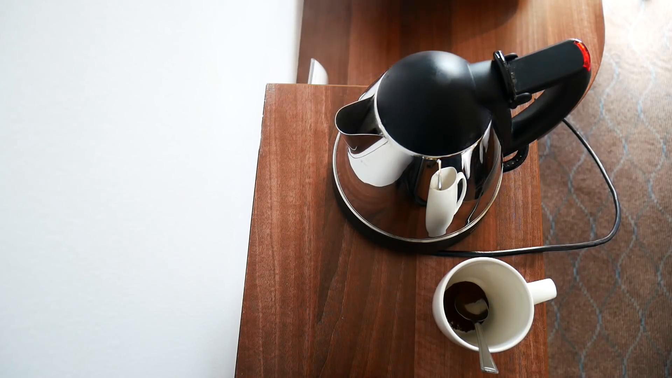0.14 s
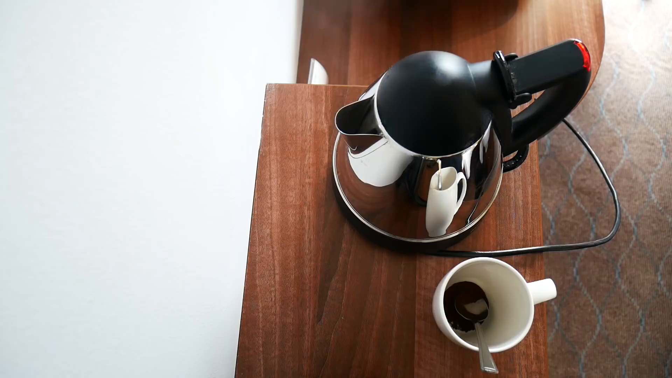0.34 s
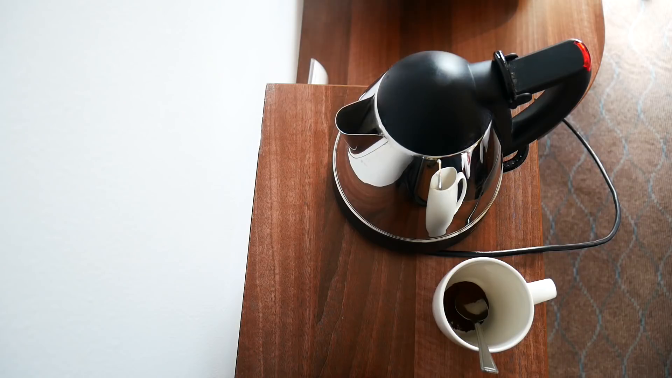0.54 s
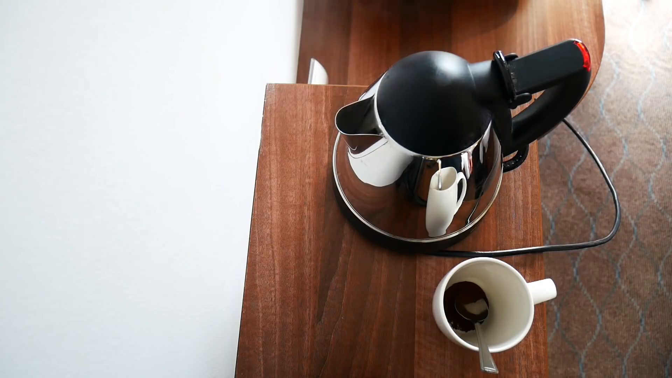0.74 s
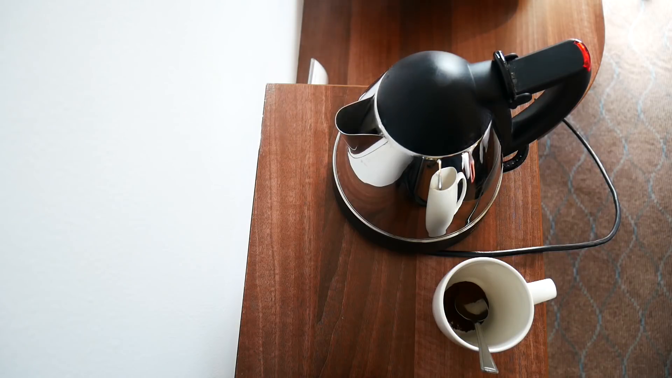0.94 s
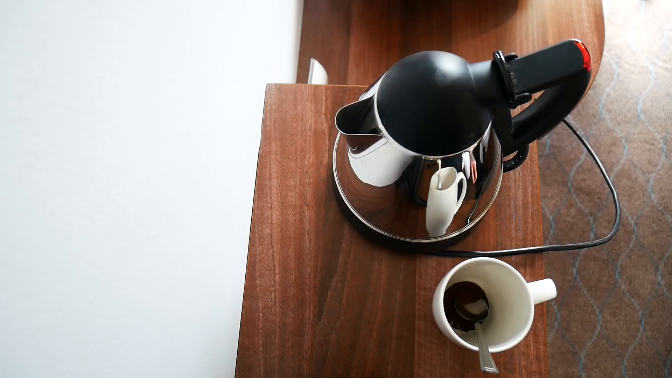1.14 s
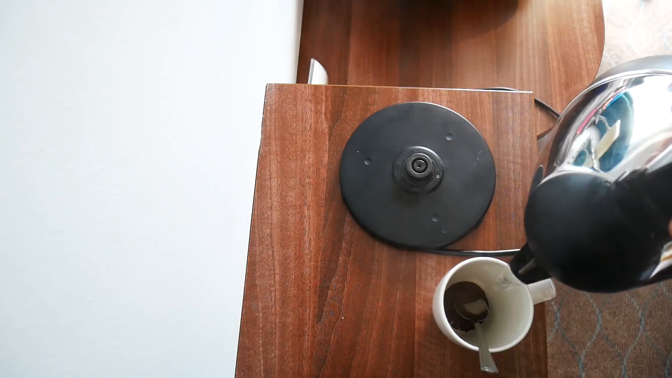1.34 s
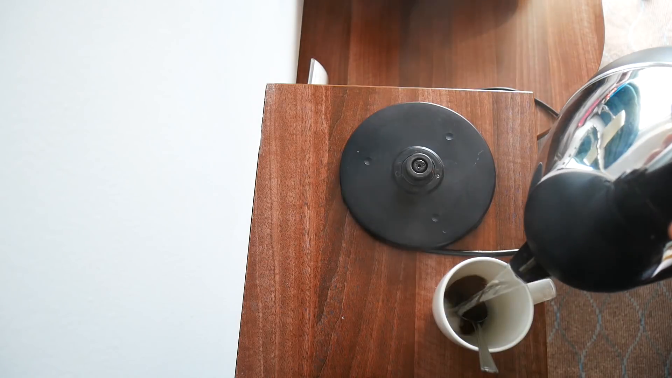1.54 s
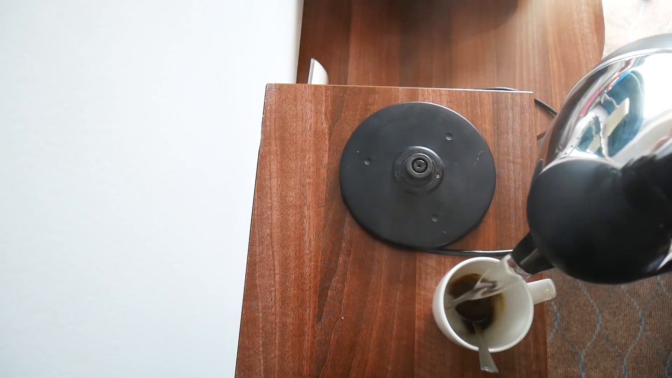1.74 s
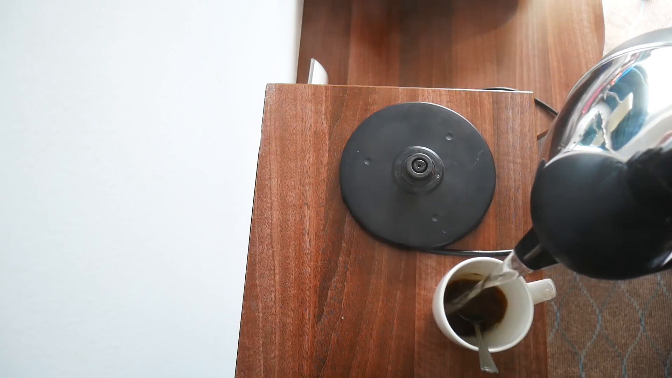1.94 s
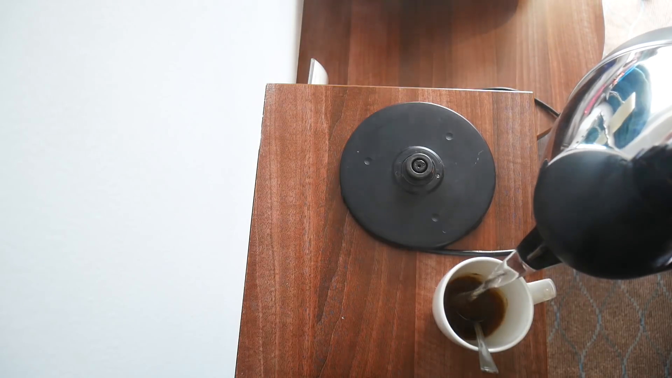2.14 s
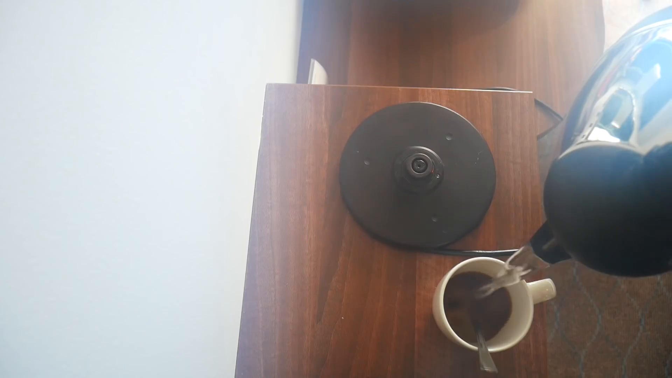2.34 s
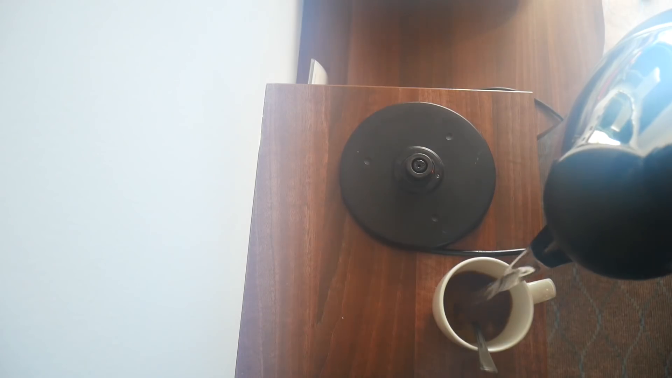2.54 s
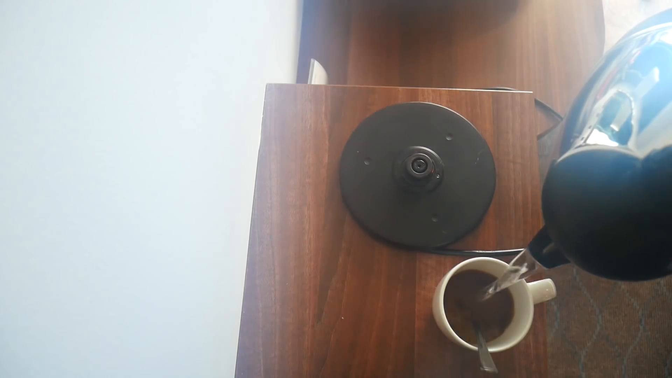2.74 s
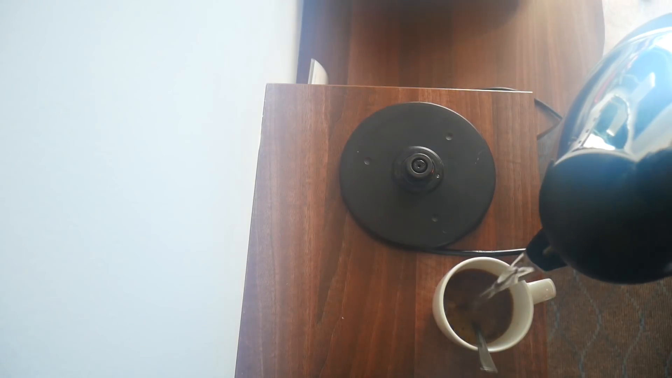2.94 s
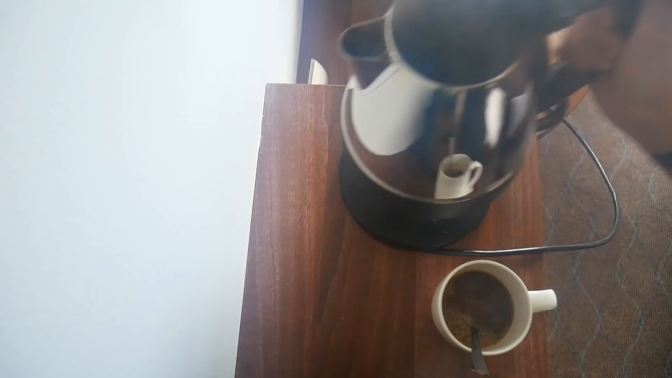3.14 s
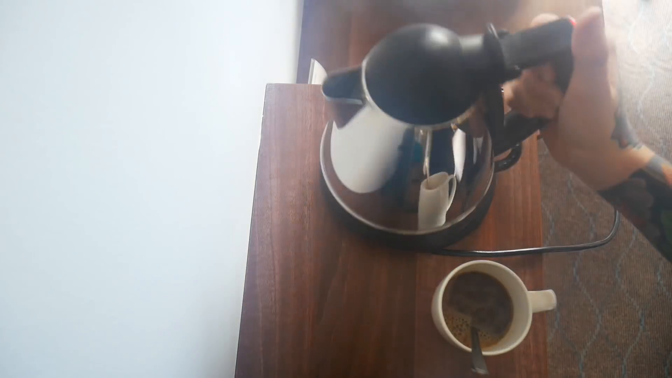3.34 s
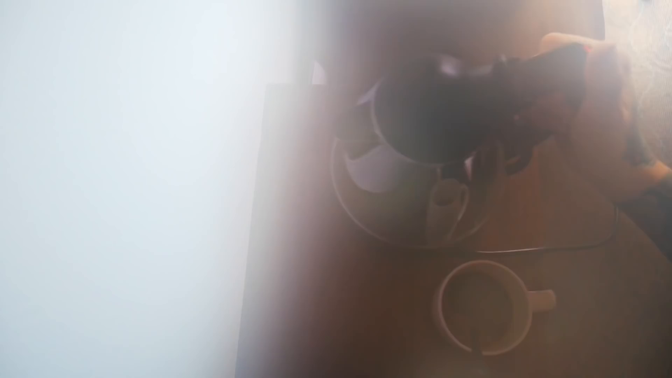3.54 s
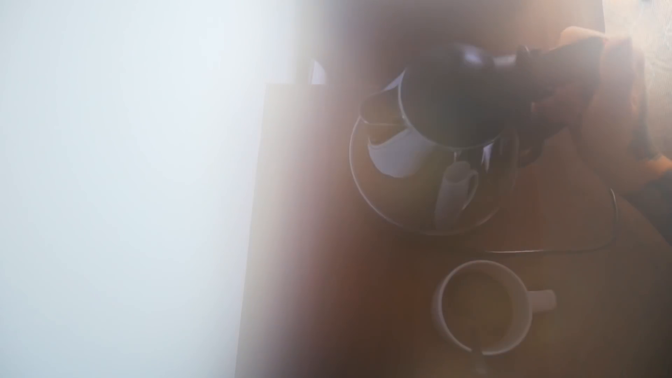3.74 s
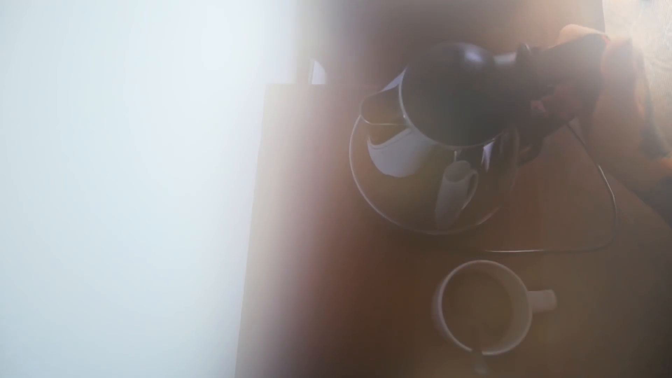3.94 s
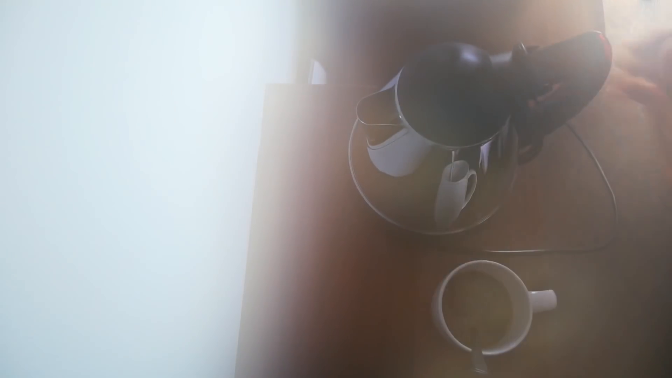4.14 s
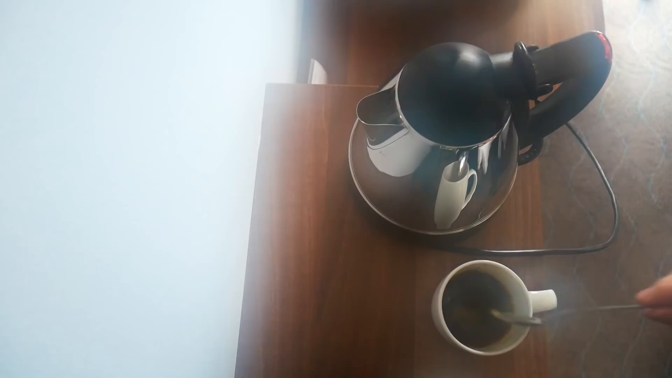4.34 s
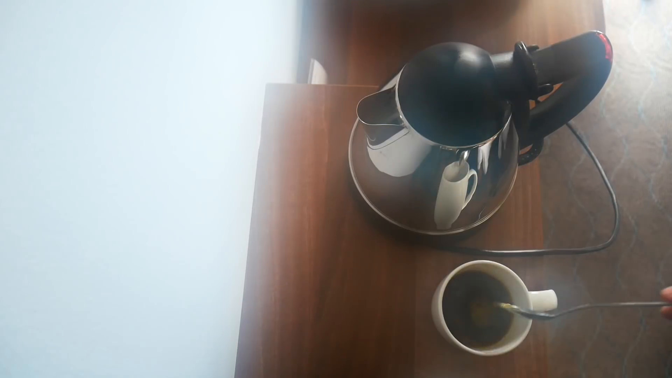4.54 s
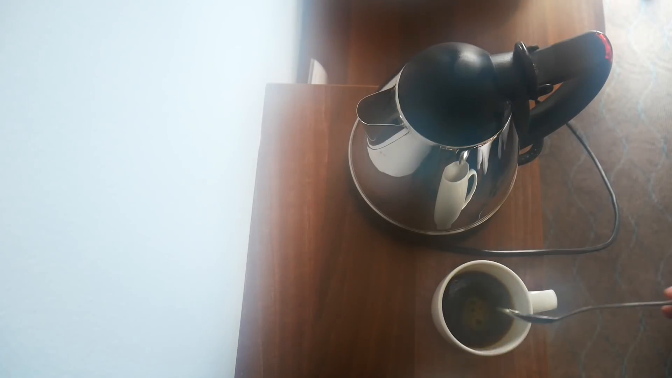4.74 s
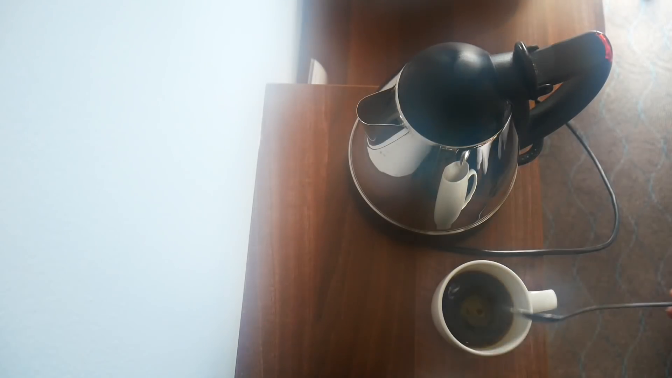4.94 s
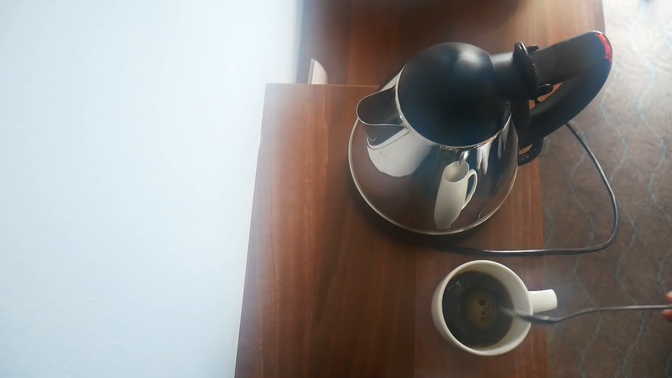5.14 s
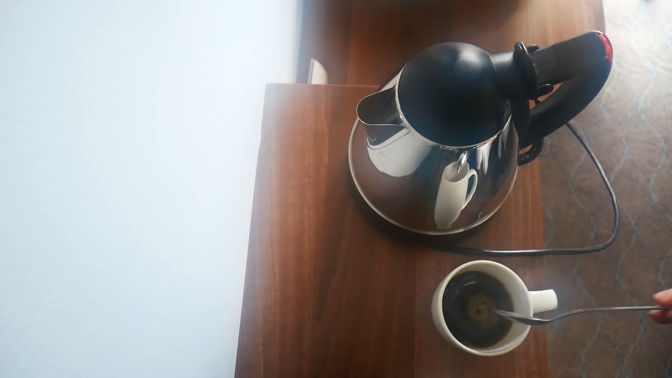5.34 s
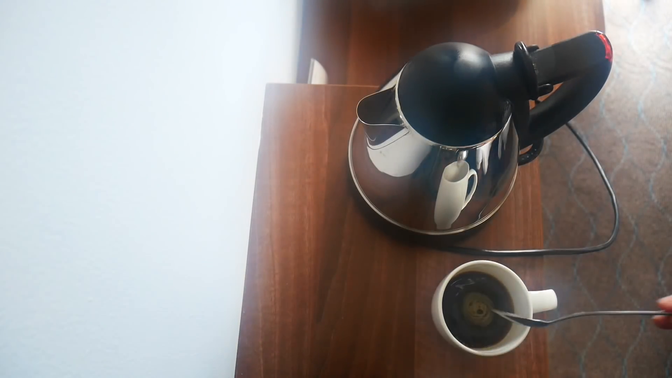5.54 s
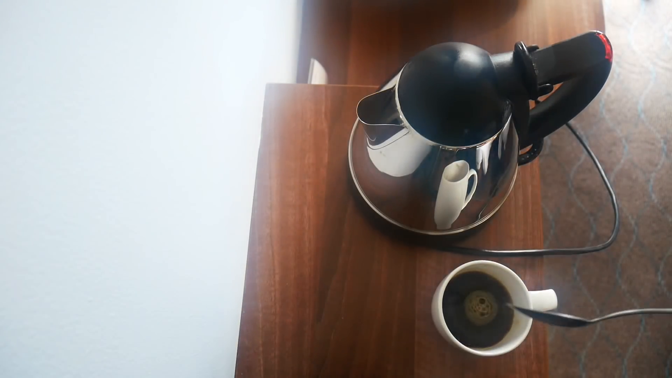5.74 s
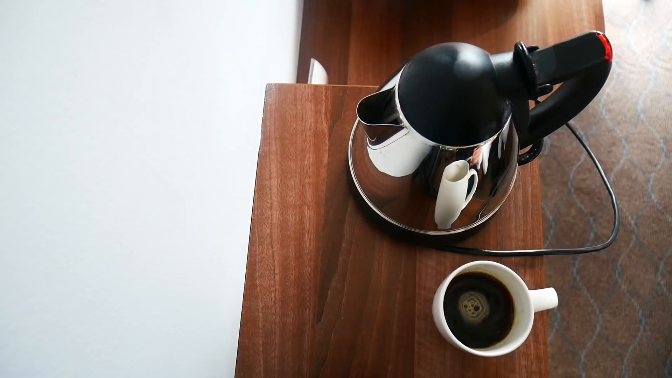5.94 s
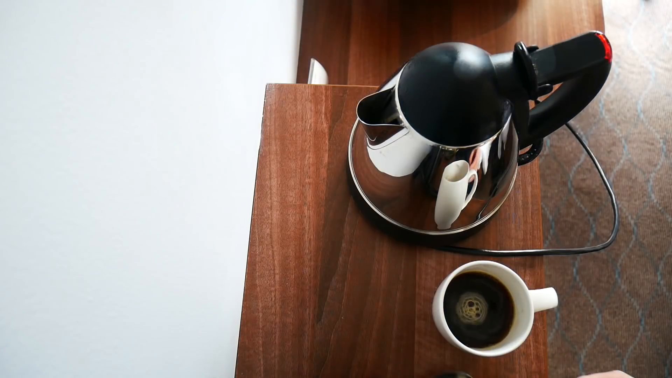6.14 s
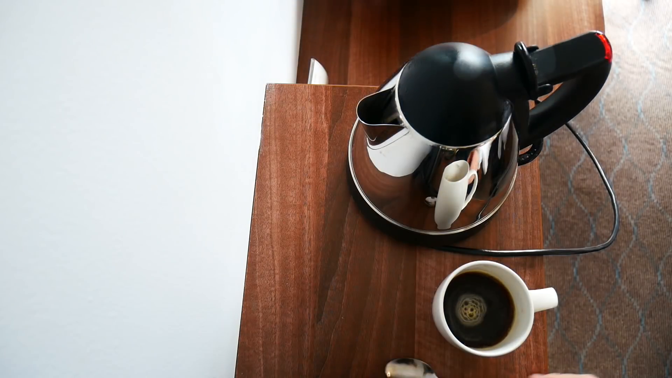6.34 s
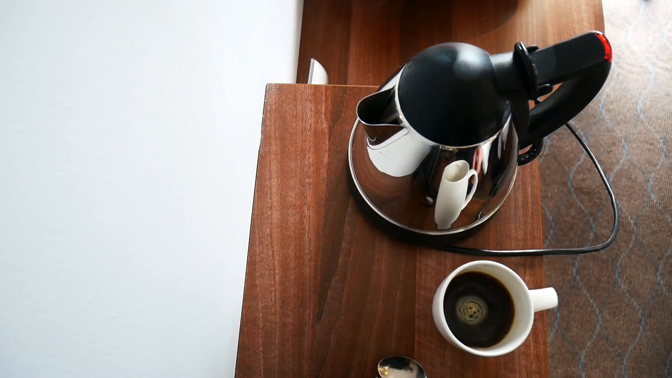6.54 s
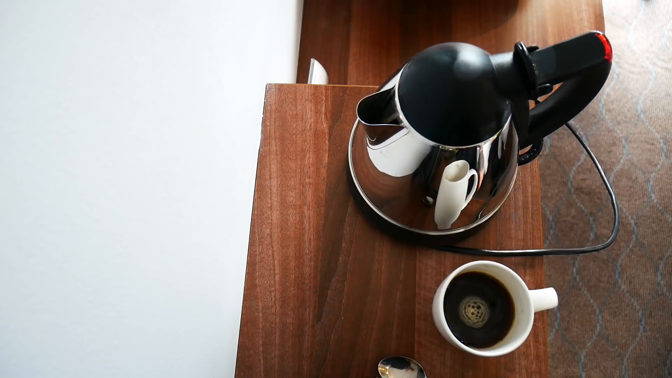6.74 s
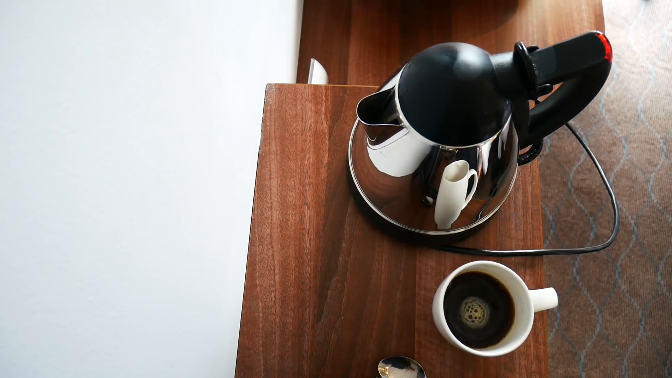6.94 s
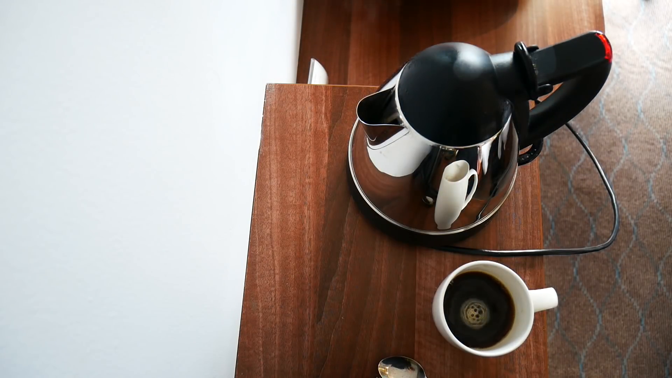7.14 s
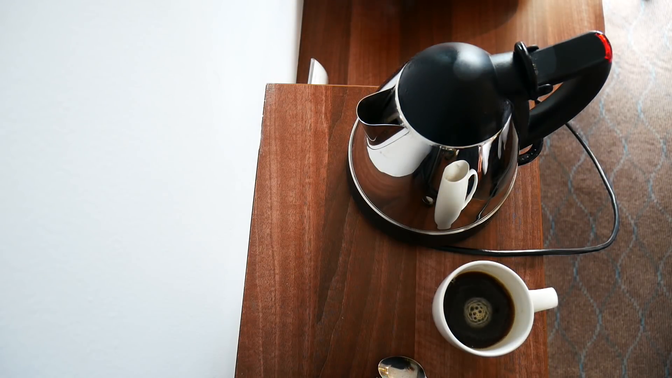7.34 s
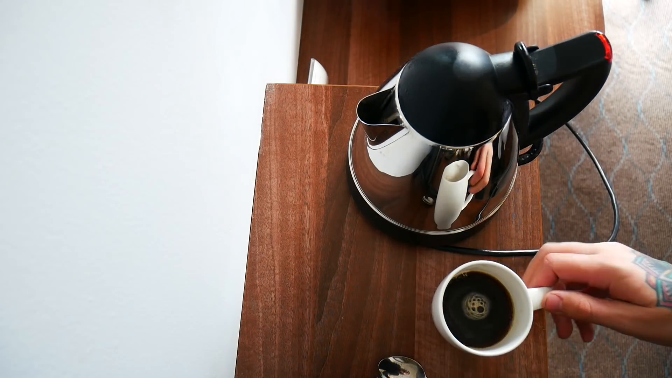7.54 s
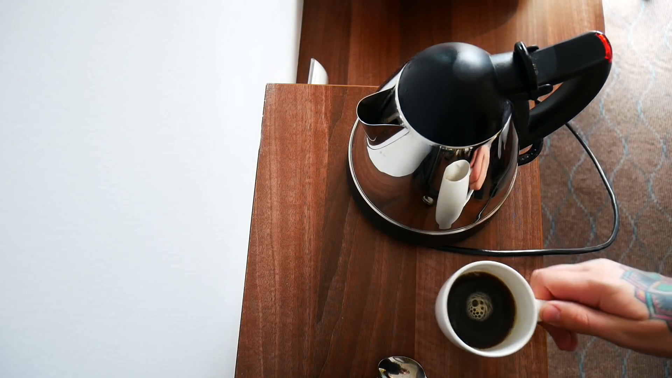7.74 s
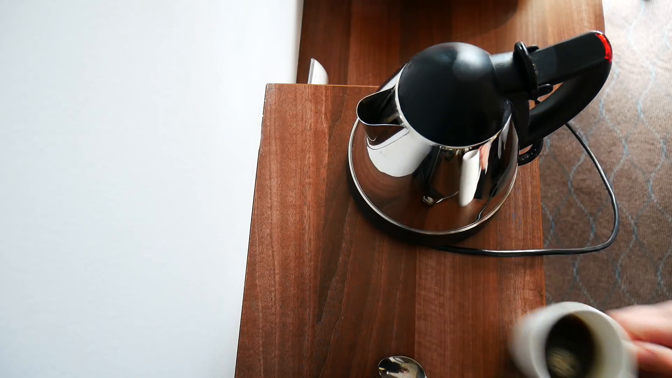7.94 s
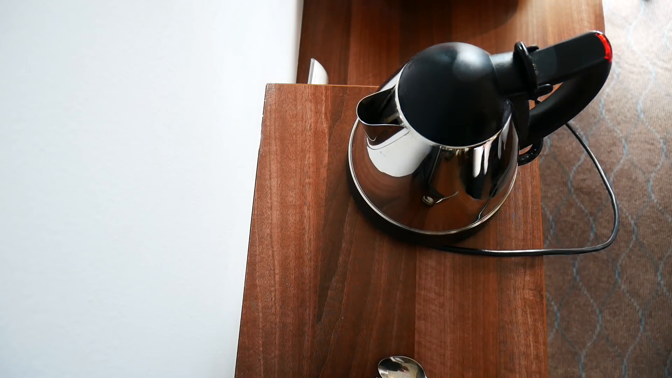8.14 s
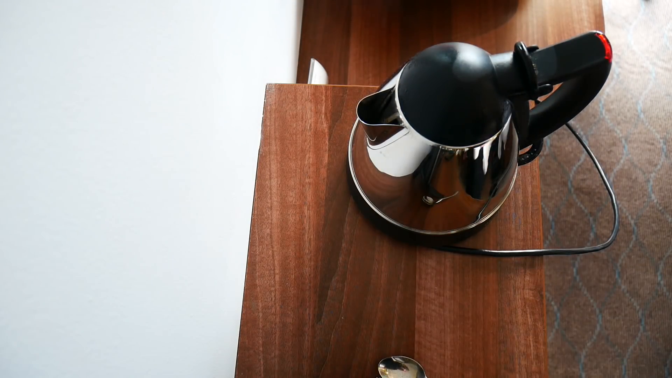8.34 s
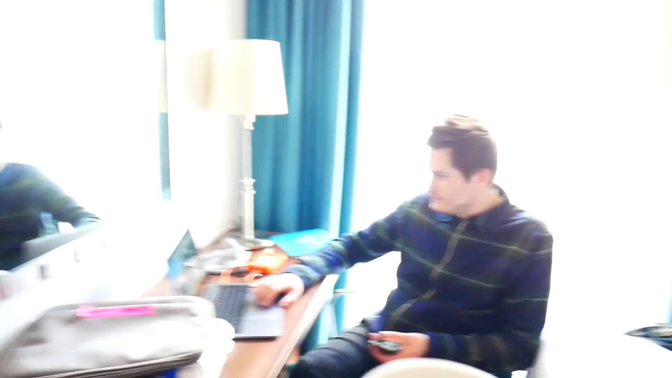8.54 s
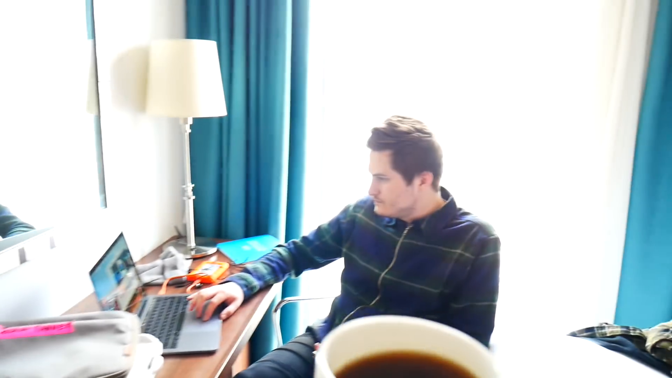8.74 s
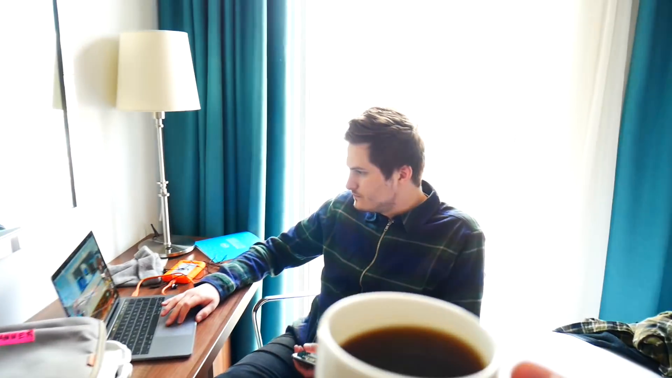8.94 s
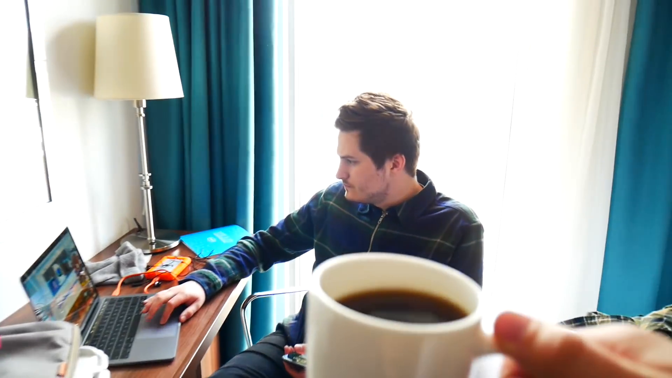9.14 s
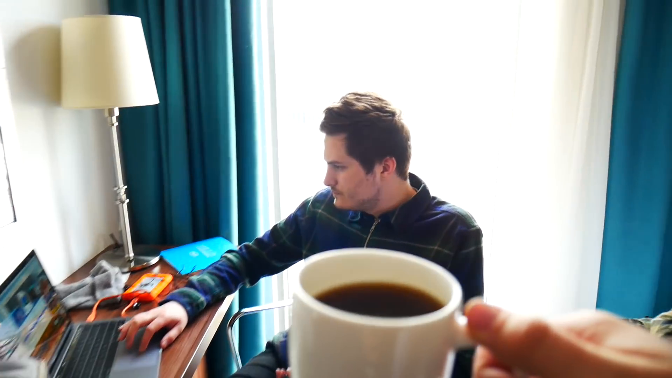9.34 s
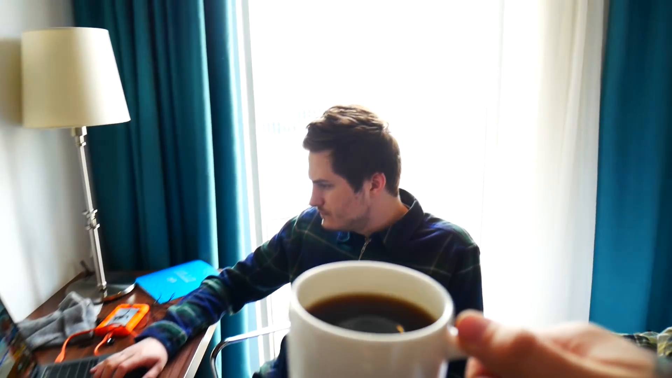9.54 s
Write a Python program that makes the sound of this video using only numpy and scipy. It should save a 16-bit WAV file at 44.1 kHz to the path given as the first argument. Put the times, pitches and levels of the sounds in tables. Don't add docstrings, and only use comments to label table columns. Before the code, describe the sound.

A small stereo camera close to a desk in a quiet room hears a rumbling boil end in a sudden cut. Quieter bright water plops fill a mug, with faint motor ticking. The kettle lands with hollow plastic knocks, a spoon clinks five times against ceramic, then falls and rocks on the desk. Fingers knock the mug, its rough foot judders off, and soft steps follow under ticking.

```python
import sys
import numpy as np
from scipy import signal
from scipy.fft import rfft, irfft, next_fast_len
from scipy.io import wavfile
from scipy.ndimage import uniform_filter1d, map_coordinates

SR = 44100
rng = np.random.default_rng(int(sys.argv[2]) if len(sys.argv) > 2 else 0)


def unload_audio(sound):
    columns = np.transpose(np.atleast_2d(sound))
    steps = np.round(np.clip(columns, -1, 1) * 32767)
    wavfile.write(sys.argv[1], SR, steps.astype(np.int16))


def amplitude_ratio(level_db):
    exponent = np.asarray(level_db, float) / 20
    return 10 ** exponent


N = 422037


SCENE_STARTS_S = [0, 1.2583, 3.142, 4.63, 9.57]
SCENE_FADES_S = [.0001, .0001, .003, .03, .0001]
# pitch in Hz, level in dB per Hz.
WATER_COLOURS = [
    [(29, -73), (50, -47.5), (150, -16.5), (242, -9.5), (346, 1.5), (449, -3.5), (518, -15.5), (627, -19),
     (876, -30.5), (1790, -25.5), (3100, -34.5), (3420, -32), (5770, -49.5), (9310, -57.5), (15000, -57)],
    [(29, -68), (50, -29.5), (330, 2.5), (459, -8), (998, -29.5), (1070, -35), (1260, -25), (1600, -30),
     (2030, -24), (3400, -29), (4110, -37), (4700, -38.5), (5800, -49.5), (9380, -59), (14000, -56.5)],
    [(29, -77), (50, -39.5), (237, -9), (322, 1), (492, -14), (623, -15), (847, -30.5), (1560, -25),
     (2120, -26), (3320, -25.5), (5200, -48), (9380, -47.5), (14000, -60)],
    [(30, -36), (60, -16), (125, -6), (200, 4), (320, 1.5), (520, -2), (950, -17.5), (1600, -15.5),
     (3200, -21), (4200, -27), (5500, -38), (7500, -40.5), (10000, -36), (14000, -49)],
]
# pitch in Hz, width in Hz, boost in dB.
SHELL_PEAKS = [(1300, 35, 5.5), (1790, 55, 6), (2780, 200, 2), (3423, 113, 11), (4920, 230, 5),
               (9310, 2200, 14)]
# time in seconds, level in dB.
RUMBLE_LEVEL = [(0.0, -22), (0.2, -17.5), (1.257, -18), (1.26, -33), (1.342, -36.5), (2.134, -37.5),
                (2.414, -43), (3.13, -46.5), (3.15, -29.5), (3.32, -34.5), (4.62, -35), (4.64, -39),
                (5.92, -43), (7.0, -47.5), (7.75, -45.5), (8.3, -46), (8.618, -50), (9.57, -52.5)]
HISS_DB = [-38.5, -51, -47, -56.5]
HISS_FOLLOWS = [-0.51, 0.73, -0.44, 1]
SPLIT_HZ = 850

# time in seconds, peak in dB.
BIG_BUBBLES = [(0.025, -11), (0.07, -15), (0.182, -3), (0.245, -6), (0.31, -12), (0.385, -6.5), (0.45, -14),
               (0.538, -3.5), (0.596, -10), (0.699, -6), (0.742, -6), (0.829, -3), (0.941, -17),
               (1.055, -5), (1.133, -8), (1.215, -19)]
# pitch in Hz, level in dB, t60 in seconds.
THUD_MODES = [(331, -1, 0.049), (438, -1, .03), (1810, -18, .01)]
# time in seconds, peak in dB.
SNAPS = [(0.164, -29), (0.2504, -29.5), (0.5174, -31), (0.6544, -27.5), (0.7707, -22), (0.797, -23),
         (0.8884, -25)]
# pitch in Hz, level in dB per Hz.
SNAP_COLOUR = [(500, -20), (900, -5), (1800, 0.5), (3500, -3), (5500, -26)]
FIRST_HISS_COLOUR = [(1500, -28), (2500, -0.5), (4800, -1.5), (6500, -24)]
WHINE = [
    (.0, .02, .1, 0.37, -58),
    (.45, 0.096, 0.22, 0.13, -46.5),
    (.8, 0.12, 0.18, .15, -55),
]
FIRST_HISS = (0, .005, .1, .35, -48)

# time in seconds, peak in dB, pitch in Hz.
POUR_GULPS = [(1.623, -23, 2470), (1.767, -32, 3400), (1.822, -26.5, 2700), (1.888, -33.5, 910),
              (1.965, -33.5, 910), (2.078, -34.5, 1000), (2.171, -36, 1000), (1.908, -19.5, 2860),
              (1.925, -29.5, 2270), (2.039, -26, 2850), (2.099, -25, 2940), (2.127, -20, 2980),
              (2.149, -17, 2780), (2.252, -18, 2900), (2.273, -28.5, 1070), (2.41, -31.5, 2990),
              (2.451, -28, 1290), (2.7, -27, 3000), (2.739, -34, 1450), (2.805, -32, 3020),
              (2.836, -33, 1300), (2.876, -26, 3080), (3.099, -36, 1300), (3.148, -18, 3100)]
# time in seconds, peak in dB, pitch in Hz.
KETTLE_GULPS = [(3.583, -27, 1570), (3.923, -27, 1630), (3.985, -25, 1640), (4.061, -28, 1580),
                (4.102, -31, 1610), (4.179, -26, 3420), (4.417, -29, 2220), (4.474, -24, 3200),
                (4.539, -35.5, 900), (4.558, -27, 840)]
# time in seconds, peak in dB.
SPITS = [(1.623, -25), (1.927, -35), (2.252, -32), (2.339, -38), (2.49, -44), (2.699, -33.5), (2.74, -33),
         (2.804, -36), (2.837, -33), (2.979, -38), (3.099, -42), (3.633, -41), (4.102, -40), (4.179, -33),
         (4.417, -39)]
SPRAY_DB = -46
# pitch in Hz, level in dB per Hz.
SPRAY_COLOUR = [(1500, -19.0), (4000, 9.0), (6000, -13), (10000, -5.0), (14000, -32)]
# time in seconds, peak in dB.
SPOON_NUDGE = [
    (1.624, -25.5),
]
# pitch in Hz, level in dB, t60 in seconds.
NUDGE_MODES = [(2460, 0.5, 0.07), (2520, -6.5, 0.09), (3250, -5, 0.066), (4200, -9, 0.11),
               (4570, -8.5, 0.07), (5630, -20.5, 0.16), (7200, -17, 0.19), (7400, -22, .08)]

# start and end in seconds, even steps in dB, whirr in dB.
FOCUS_RUNS = [
    (2.295, 3.116, -43, -83),
    (5.971, 6.343, -55, -71.5),
    (8.5946, 9.521, -47, -70.5),
]
# time in seconds, peak in dB.
HARD_STEPS = [(8.5954, -36), (8.6157, -37), (8.6348, -46), (8.6747, -43), (8.695, -33), (8.7156, -40),
              (8.777, -37.5), (8.8149, -45), (8.852, -42), (8.8626, -43), (8.8947, -33), (8.9146, -36),
              (8.975, -36), (9.0149, -42), (9.0354, -37), (9.0548, -51), (9.0952, -42), (9.1551, -40),
              (9.1755, -37), (9.195, -37), (9.2354, -34), (9.2948, -44), (9.375, -44), (9.402, -38),
              (9.415, -37), (9.435, -41), (9.4948, -36)]
# pitch in Hz, level in dB, t60 in seconds.
MOTOR_MODES = [(2220, -10, 0.015), (2910, -4, .008), (3243, -0.5, 0.014), (3780, -6, 0.0092),
               (4200, -12, 0.004)]
STEP_HZ = 50.03

TRICKLE = (2.5, .5, .5, -3, -50.5)

# time in seconds, level in dB.
SLAPS = [(3.153, -38.5), (3.213, -42), (3.262, -37.5), (3.31, -41)]
# pitch in Hz, level in dB, t60 in seconds.
SLAP_MODES = [(1300, -10, 0.099), (2000, -5, 0.042), (2700, -1.5, 0.018), (3100, 1.5, 0.021),
              (3680, 2, 0.016), (4600, -7, 0.0095)]
SLAP_RISE_S, SLAP_FALL_S = .03, 0.071

# time in seconds, peak in dB.
BASE_KNOCKS = [(3.389, -1), (3.413, -22.5), (3.727, -25.5), (3.732, -17.5), (3.7495, -16), (3.746, -12.5),
               (3.756, -3.5), (3.770, -1.5), (3.846, -11), (3.85, -19), (3.858, -20)]
# pitch in Hz, level in dB per Hz.
BASE_COLOUR = [(47, -59), (80, -36), (199, -1), (353, -7), (493, 6.5), (751, -5), (980, -10), (1300, -4),
               (1780, -0.5), (2840, 0.5), (4200, -13), (5900, -27), (10000, -27.5), (16000, -59)]
# pitch in Hz, level in dB, t60 in seconds.
BASE_MODES = [(753, -5.0, 0.018), (1106, 2.5, 0.0059), (1510, -7.5, 0.023), (2750, -4, 0.016)]
BASE_RUB = [
    (3.395, 0.018, 0.013, .06, -23),
    (3.714, 0.027, 0.033, .02, -16.5),
    (3.78, 0.0052, 0.073, 0.11, -29.5),
]

# time in seconds, peak in dB, lowest mode in Hz, its partner in dB, free ring in seconds.
TAPS = [
    (4.774, -7, 2065, -11, .09),
    (4.974, -8, 2120, -14.5, .1),
    (5.191, -5.5, 2135, -7.5, .1),
    (5.416, -7, 2164, -8, .09),
    (5.679, -6, 2153, 0, 0.1),
]
# low ring, handle mode, upper modes, muffling and crack, all in dB.
TAP_GRIP = [(-17, 0, -8.5, -8, -1.5), (-8.5, -10, -9, -14, -0.5), (-11, -1, -14, -10, -1.5),
            (-7.5, -1, -15.5, -13, -2), (-8, 10.5, -15, -14, -3.5)]
# level in dB, t60 in seconds.
MUG_HZ = [2153, 2223, 2347, 2972, 3560, 4310, 4640, 5534, 6918, 8479, 1400, 10060, 11243, 13200]
MUG_MODES = [(-2.5, 0.27), (-0.5, 0.092), (-2, 0.41), (-4, 0.07), (-7.5, 0.076), (-25, 0.045),
             (-10.5, 0.074), (-22, 0.044), (-23, 0.102), (-20, 0.071), (-5.5, 0.042), (-29, 0.08),
             (-32, 0.05), (-31, .07)]
# pitch in Hz, level in dB per Hz.
TAP_COLOUR = [(88, -45), (150, -17), (391, -6), (821, -23.5), (1340, -4.5), (1790, -22), (2140, -2),
              (2400, -8.5), (3040, -5), (5500, -27), (6020, -32), (6770, -35), (10000, -22.5),
              (11800, -42.5), (15500, -44.5)]
GLAZE_COLOUR = [(4000, -32), (5900, -46), (6900, 0), (7700, -23), (10000, -1.5), (11200, -16), (12500, -45),
                (13200, -8), (13900, -40.5)]
DESK_TAIL = [(120, -30), (280, 7.5), (450, -7), (640, -2), (900, -23), (1400, -15.5), (2500, -17),
             (5000, -41)]
# pitch in Hz, level in dB, t60 in seconds.
DESK_MODES = [(247, -4.5, 0.073), (297.3, 2.5, 0.1), (342.7, -4, 0.22), (410.6, -4.5, 0.23),
              (477, -3.5, 0.091), (639.4, -6, 0.14), (980, -12.5, 0.086)]
REBOUND_S, REBOUND_DB = 0.011, -9.5
PARTNER_RISE_S = 0.015
THUMP_DB = -11.5
MUFFLE_S, LEAN_DB_PER_S = .015, -110

# time in seconds, peak in dB, steel tick in dB.
BOUNCES = [(6.352, -0.5, -23.5), (6.402, -21, -24), (6.418, -16, -33), (6.43, -23, -37), (6.524, -18, -9.5),
           (6.574, -27, -26), (6.582, -20, -21), (6.624, -25, -32.5), (6.633, -18.5, -26),
           (6.675, -18.5, -25.5), (6.71, -20.5, -33)]
# pitch in Hz, level in dB per Hz.
LAND_COLOUR = [(88, -50), (150, -22.5), (260, -3), (402, -5.5), (982, -8.5), (1040, -9.5), (2310, -5),
               (3640, -7), (4750, -16), (5220, -22.5), (8880, -24), (13000, -40), (15500, -41.5)]
STEEL_TICK = [(1470, -46.5), (2500, -21), (3920, 4.5), (6350, -17.5), (10100, -2.5), (10900, -29.5),
              (13600, -27), (16000, -36.5)]
# pitch in Hz, level in dB, t60 in seconds.
LAND_MODES = [(1920, -0.5, 0.064), (2293, -0.5, 0.062), (2720, -11.5, .04), (3100, 1, 0.05)]
# pitch in Hz, width in Hz, boost in dB.
SPOON_RUB_PEAKS = [(1890, 220, 4.8), (2260, 56, 3.0), (3620, 200, 3.3)]
SPOON_RUB = [
    (6.39, .012, 0.0046, 0.17, -22.5),
    (6.48, 0.054, 0.26, 0.075, -35),
]
# level in dB, t60 in seconds, left minus right in dB.
SPOON_HZ = [3566, 4719, 6963, 8555, 9302, 10077, 10970, 11243, 12669, 13400]
SPOON_MODES = [(12.5, 0.077, -1.5), (2, 0.27, -7.5), (2.5, .12, -4), (-2.5, 0.49, -8.5), (-7.5, .05, -6),
               (1.5, 0.19, -12), (-6.5, .15, -3), (0.5, 0.18, -6.5), (-7, .15, -6), (-12, .08, -7)]
# time in seconds, low mode, bright mode and other modes in dB.
ROCKS = [(6.403, -48.5, -58, -57), (6.418, -47.5, -63.5, -53.5), (6.47, -57.5, -54, -62.5),
         (6.524, -35, -34, -52.5), (6.578, -44, -34, -47.5), (6.606, -45, -37, -54),
         (6.631, -40, -43.5, -45), (6.652, -39, -33.5, -52), (6.675, -32.5, -40.5, -51),
         (6.698, -34, -33, -48.5), (6.72, -46, -39, -54), (6.75, -57, -55, -56), (6.785, -53, -52, -61),
         (6.812, -46.5, -63, -63.5)]
# time in seconds, how long it takes in seconds, change in dB.
SPOON_RESTS = (6.83, 0.046, -20)

# time in seconds, peak in dB.
FINGER_KNOCKS = [
    (7.769, -12.5),
    (7.776, -7.5),
    (7.823, -16),
]
# time in seconds, peak in dB.
SLIPS = [(7.895, -18), (7.908, -10), (7.933, -15.5), (7.949, -10.5), (7.957, -5), (7.971, -17),
         (8.014, -16), (8.037, -8), (8.058, -10), (8.08, -15.5), (8.107, -18.5)]
# pitch in Hz, level in dB, t60 in seconds.
FOOT_MODES = [(241, -0.5, 0.081), (286, 2, 0.1), (348, -3, 0.095), (409.5, -3, 0.14), (498, -2.5, 0.092),
              (650, -4, 0.091), (712, -8.5, 0.055), (960, -17, 0.071), (1545, -25, 0.12)]
SLIP_MODES = [(163, -28, 0.091), (303, 0.5, 0.065), (419, -3, 0.053), (650, -8, .06), (1000, -19.5, .03)]
# pitch in Hz, level in dB per Hz.
SLIP_COLOUR = [(900, -22), (2500, 3), (5000, -13.5), (6500, -30), (9600, -12), (13000, -35)]
RUB_COLOUR = [(47, -62.5), (80, -35), (125, -28), (289, 5), (504, -11), (563, -17), (657, -4.5), (785, -18),
              (980, -22), (1140, -29.5), (1530, -27.5), (5770, -42.5), (6590, -51.5), (9610, -35.5),
              (16000, -76)]
# pitch in Hz, width in Hz, boost in dB.
MUG_RUB_PEAKS = [(2600, 750, 4.7), (3500, 470, 5.4)]
MUG_JUDDER = [
    (7.875, 0.019, 0.08, 0.24, -21.5),
    (8.0, 0.029, 0.063, 0.11, -23.5),
]
MUG_GRIT = [
    (7.8, 0.098, 0.081, 0.17, -39.5),
    (7.93, 0.12, 0.06, 0.043, -35.5),
]
MUG_HISS = [(7.78, .2, 0.13, 0.037, -49)]

STEPS = [
    (8.77, 0.083, 0.016, 0.084, -44.5),
    (9.14, 0.11, 0.028, 0.23, -49),
]
# pitch in Hz, level in dB per Hz.
SCUFF_COLOUR = [(150, -12), (600, 1.0), (1000, -10), (1700, -2), (4000, -8.5), (6000, -37.5),
                (10000, -25.5), (14000, -51)]

# pitch in Hz, side minus middle in dB.
PORT_SIDE = [(60, -18.5), (110, -11), (200, -15), (380, -19.5), (700, -4.5), (1290, -3), (2380, -15),
             (4400, -8), (8120, -1), (15000, -12.5)]
MONO_BAND_HZ = [2450, 4700]
LOUD_DB = -30
ROOM_T60_S, TOP_HZ = 0.35, 15700


def rms_one(x):
    return x / np.sqrt(np.mean(x ** 2) + 1e-20)


def level(rows):
    rows, at = np.array(rows), np.arange(0, N + 32, 32)
    gain = amplitude_ratio(np.interp(at / SR, rows[:, 0], rows[:, 1], left=-200, right=-200))
    return np.interp(np.arange(N), at, uniform_filter1d(gain, size=4))


def stroke(start, rise, hold, fall, db):
    times = start + np.cumsum(np.abs([0, rise, hold, fall]))
    return level(np.transpose([times, db - np.array([30, 0, 0, 30])]))


def drift(rate):
    knots = rng.standard_normal(int(N / SR * rate * 2) + 3)
    at = np.arange(0, N + 32, 32)
    smooth = map_coordinates(knots, [at / SR * rate * 2], order=3, mode="nearest")
    return rms_one(np.interp(np.arange(N), at, smooth))


def colour(x, points, peaks=()):
    hz, (f, d) = np.linspace(1, SR / 2, 4097), np.transpose(points)
    db = np.interp(np.log(hz), np.log(f), d)
    db = db + sum(g / (1 + (2 * (hz - c) / w) ** 2) for c, w, g in peaks)
    cepstrum = irfft(np.log(amplitude_ratio(db)))
    cepstrum[1:4096] = 2 * cepstrum[1:4096]
    cepstrum[4097:] = 0
    pulse = irfft(np.exp(rfft(cepstrum)))
    return signal.oaconvolve(x, pulse / np.linalg.norm(pulse))[:N]


def ring(clicks, hz, t60):
    r, w = amplitude_ratio(-60 / (t60 * SR)), 2 * np.pi * hz / SR
    return signal.lfilter([0, np.sin(w)], [1, -2 * r * np.cos(w), r * r], clicks + 1e-18)


def body(clicks, modes):
    return sum(amplitude_ratio(db) * ring(clicks, hz, t60) * (-1) ** k for k, (hz, db, t60) in enumerate(modes))


def clicks(times, db):
    out = np.zeros(N)
    out[(np.asarray(times) * SR).astype(int)] = amplitude_ratio(np.asarray(db))
    return out


def grit(per_s, spread_db):
    sizes = amplitude_ratio(spread_db * np.minimum(rng.exponential(1, N), 4)) * rng.choice([-1, 1], N)
    return rms_one(sizes * (rng.random(N) < per_s / SR))


def crack(hits, points, burst_db, burst_s, click_db):
    fading = signal.lfilter([1], [1, -amplitude_ratio(-60 / (burst_s * SR))], hits)
    rattle = amplitude_ratio(burst_db) * fading * rng.standard_normal(N)
    return colour(amplitude_ratio(click_db) * hits + rattle, points)


def water():
    out, t = np.zeros(N), np.arange(N) / SR
    low = signal.butter(4, SPLIT_HZ, "low", fs=SR, output="sos")
    high = signal.butter(4, SPLIT_HZ, "high", fs=SR, output="sos")
    lumps = grit(per_s=1100, spread_db=2.5) * amplitude_ratio(1.27 * drift(10) + 0.97 * drift(30))
    fine = grit(per_s=6000, spread_db=0.0) * amplitude_ratio(0.63 * drift(12) + 1.13 * drift(60))
    begun = [np.clip((t - start) / fade + .5, 0, 1) for start, fade in zip(SCENE_STARTS_S, SCENE_FADES_S)]
    db = np.interp(t, *np.transpose(RUMBLE_LEVEL))
    for k, points in enumerate(WATER_COLOURS):
        shown = begun[k] - begun[k + 1]
        rumble = rms_one(signal.sosfilt(low, colour(lumps, points)))
        hiss = rms_one(signal.sosfilt(high, colour(fine, points, SHELL_PEAKS if k < 2 else ())))
        hiss_db = HISS_DB[k] + HISS_FOLLOWS[k] * (db - db[shown > .5].mean())
        out += (amplitude_ratio(db) * rumble + amplitude_ratio(hiss_db) * hiss) * shown
    before = SCENE_STARTS_S[1] - t
    swing = np.sin(2 * np.pi * 370 * before + 0.46) * np.exp(-np.abs(before) / 0.003)
    return out - amplitude_ratio(-11.0) * swing * (before > 0)


def boil():
    thuds = amplitude_ratio(-7.0) * body(clicks(*np.transpose(BIG_BUBBLES)), THUD_MODES)
    noise = rng.standard_normal((2, N))
    whine = sum(stroke(*row) for row in WHINE) * rms_one(ring(noise[0], 3425, 0.055))
    spit = stroke(*FIRST_HISS) * colour(noise[1], FIRST_HISS_COLOUR)
    snaps = crack(clicks(*np.transpose(SNAPS)), SNAP_COLOUR, -7.0, .012, 4.0)
    return (thuds + snaps + whine + spit) * (np.arange(N) < SCENE_STARTS_S[1] * SR)


def pour():
    out, rows, t = np.zeros(N), np.array(POUR_GULPS + KETTLE_GULPS), np.arange(1500) / SR
    luck = rng.standard_normal((len(rows), 3, 5))
    for (s, db, hz), (late, pitch, size) in zip(rows, luck):
        for k in range(5):
            i = int((s + 0.0072 * k * (1 + .3 * late[k])) * SR)
            f = hz * np.exp(.12 * pitch[k] * (k > 0))
            life = .0022 * (1500 / f) ** 1.1
            gain = amplitude_ratio(db - 2.5 - (4 * k + 2.5 * size[k]) * (k > 0))
            rising = np.sin(2 * np.pi * f * t * (1 + 3.6 * t))
            out[i:i + len(t)] += gain * rising * np.exp(-t / life) * (1 - np.exp(-t / 0.00023))
    spray = clicks(rows[:, 0], SPRAY_DB) + clicks(*np.transpose(SPITS))
    out += crack(spray, SPRAY_COLOUR, -13.0, 0.015, 4.1)
    return out + body(clicks(*np.transpose(SPOON_NUDGE)), NUDGE_MODES) * amplitude_ratio(-8.0)


def focus_motor():
    whirr, ticks = np.zeros(N), amplitude_ratio(-5.0) * clicks(*np.transpose(HARD_STEPS))
    for start, end, step_db, whirr_db in FOCUS_RUNS:
        s = np.arange(start, end, 1 / STEP_HZ)[:50]
        luck = rng.standard_normal(50) * 2.2
        ticks += clicks(s, step_db + luck[:len(s)])
        running = stroke(start - .04, 0.044, end - start, 0.055, whirr_db)
        whirr += running * rng.standard_normal(N) * amplitude_ratio(3.2 * drift(40))
    scratch = signal.lfilter([1], [1, -amplitude_ratio(-60 / (0.017 * SR))], ticks) * rng.standard_normal(N)
    return body(whirr + amplitude_ratio(-5.5) * ticks + amplitude_ratio(-16.5) * scratch, MOTOR_MODES)


def trickle():
    pops, dealt = grit(per_s=350, spread_db=3.0), rng.integers(0, 12, N)
    pitches = np.geomspace(900, 4300, 12)
    rings = sum(ring(pops * (dealt == k), hz, 19.0 / hz) for k, hz in enumerate(pitches))
    soft = signal.butter(3, 3800, fs=SR, output="sos")
    shown = np.arange(N) < SCENE_STARTS_S[2] * SR
    return stroke(*TRICKLE) * shown * rms_one(signal.sosfilt(soft, rings))


def slosh():
    slaps = grit(per_s=1400, spread_db=4.0) * amplitude_ratio(4.9 * drift(16))
    swings = sum(stroke(s - SLAP_RISE_S, SLAP_RISE_S, 0, SLAP_FALL_S, db) for s, db in SLAPS)
    return swings * rms_one(body(slaps, SLAP_MODES))


def seat():
    hits = clicks(*np.transpose(BASE_KNOCKS))
    rough = colour(grit(per_s=1600, spread_db=2.5), BASE_COLOUR)
    grind = sum(stroke(*row) for row in BASE_RUB) * rough * amplitude_ratio(-7.0)
    knock = body(hits, BASE_MODES)
    return crack(hits, BASE_COLOUR, -9.5, 0.023, 9.7) + amplitude_ratio(-5.5) * knock + grind


def taps():
    s, db, first_hz, partner_db, free_s = np.transpose(TAPS)
    desk_blow = clicks(s + .002, db + THUMP_DB)
    thump = amplitude_ratio(-5.0) * body(desk_blow, DESK_MODES) * amplitude_ratio(4.04 * drift(40))
    thump += crack(desk_blow, DESK_TAIL, -3.5, 0.16, 0.52)
    out = crack(clicks(s, db + np.array(TAP_GRIP)[:, -1]), TAP_COLOUR, -6.0, 0.014, 12.5) + thump
    twice = clicks(s, db) + clicks(s + REBOUND_S, db + REBOUND_DB)
    glaze = crack(twice, GLAZE_COLOUR, -6.0, .01, 9.3) + crack(twice, GLAZE_COLOUR, -19.0, 0.2, -20.0)
    out += amplitude_ratio(-22.0) * glaze
    luck, t = rng.standard_normal((len(s), len(MUG_MODES))), np.arange(SR) / SR
    for k in range(len(s)):
        foam = len(s) - 1 - k
        low_db, handle_db, high_db, muffle_db, _ = TAP_GRIP[k]
        modes = []
        for j, (hz, (mode_db, t60)) in enumerate(zip(MUG_HZ, MUG_MODES)):
            if j < 3:
                hz = hz * first_hz[k] / MUG_HZ[0]
                mode_db = mode_db + low_db
            else:
                mode_db = mode_db + 1.2 * luck[k, j] + high_db
            mode_db = mode_db + partner_db[k] * (j == 2) + handle_db * (j == 10)
            modes.append((hz, mode_db, t60 / (1 + 0.29 * foam)))
        i = int(s[k] * SR)
        waver_db = (.6 + foam * .8) * drift(35)[i:i + SR]
        held_s = t - free_s[k]
        muffled_db = muffle_db * np.clip(held_s / MUFFLE_S, 0, 1) + LEAN_DB_PER_S * np.maximum(held_s, 0)
        blow, swell = np.eye(1, SR)[0] * amplitude_ratio(db[k]), 1 - np.exp(-t / PARTNER_RISE_S)
        mug = body(blow, modes[:2] + modes[3:]) + swell * body(blow, modes[2:3])
        out[i:i + SR] += amplitude_ratio(waver_db + muffled_db) * mug
    return out


def spoon():
    s, db, tick_db = np.transpose(BOUNCES)
    out = crack(clicks(s, db), LAND_COLOUR, -10.5, 0.046, 6.1)
    out += crack(clicks(s, tick_db), STEEL_TICK, -3.0, 0.014, 5.0)
    out += amplitude_ratio(-15.0) * body(clicks(s, db), LAND_MODES)
    dull = signal.butter(3, 7500, fs=SR, output="sos")
    rough = colour(grit(per_s=1200, spread_db=1.5), LAND_COLOUR, SPOON_RUB_PEAKS)
    return out + sum(stroke(*row) for row in SPOON_RUB) * signal.sosfilt(dull, rough)


def spoon_ring():
    rows, out, t = np.array(ROCKS), np.zeros((2, N)), np.arange(N) / SR
    luck = rng.normal(0, 3.8, (len(rows), len(SPOON_MODES)))
    lying_flat = np.clip((t - SPOON_RESTS[0]) / SPOON_RESTS[1], 0, 1)
    for k, (hz, (mode_db, t60, pan_db)) in enumerate(zip(SPOON_HZ, SPOON_MODES)):
        column = {1: 1, 5: 2}.get(k, 3)
        fed_db = rows[:, column] + mode_db + 5.0 + luck[:, k] * (column == 3)
        fed = clicks(rows[:, 0], fed_db) ** 2
        energy = signal.lfilter([1], [1, -amplitude_ratio(-120 / (t60 * SR))], fed + 1e-18)
        height = np.sqrt(np.abs(uniform_filter1d(energy, size=160))) * amplitude_ratio(1.5 * drift(30))
        height *= amplitude_ratio(SPOON_RESTS[2] * lying_flat * (column == 1))
        out += height * np.sin(2 * np.pi * hz * t + 0.91 * drift(25)) * pan(pan_db)
    return out


def mug_slide():
    judder = rms_one(body(grit(per_s=500, spread_db=0.0), FOOT_MODES))
    judder = signal.sosfilt(signal.butter(2, 130, "high", fs=SR, output="sos"), judder)
    rub = colour(grit(per_s=3000, spread_db=2.5) * amplitude_ratio(0.81 * drift(40)), RUB_COLOUR, MUG_RUB_PEAKS)
    middle = signal.butter(3, [1000, 6300], "band", fs=SR, output="sos")
    top = signal.butter(4, 6300, "high", fs=SR, output="sos")
    out = sum(stroke(*row) for row in MUG_JUDDER) * judder
    out += sum(stroke(*row) for row in MUG_GRIT) * rms_one(signal.sosfilt(middle, rub))
    out += stroke(*MUG_HISS[0]) * rms_one(signal.sosfilt(top, rub))
    slips = clicks(*np.transpose(SLIPS))
    out += amplitude_ratio(-5.0) * body(slips, SLIP_MODES) + amplitude_ratio(-32.5) * crack(slips, SLIP_COLOUR, -3.5, 0.04, 0.0)
    out += ring(clicks([8.126], [-31.0]), 950, 0.085)
    shorter = [(hz, db, t60 * 0.75) for hz, db, t60 in FOOT_MODES]
    out += amplitude_ratio(-11.5) * body(clicks(*np.transpose(FINGER_KNOCKS)), shorter)
    return signal.sosfilt(signal.butter(4, 160, "high", fs=SR, output="sos"), out)


def steps():
    return sum(stroke(*row) for row in STEPS) * colour(rng.standard_normal(N), SCUFF_COLOUR)


def room(x):
    t = np.arange(SR // 2) / SR
    mid, side = rng.standard_normal((2, len(t))) * amplitude_ratio(-60 * t / ROOM_T60_S) * (t > .006)
    tails = signal.lfilter([1], [1, -.7], [mid + amplitude_ratio(-5.0) * side, mid - amplitude_ratio(-9.5) * side])
    return signal.oaconvolve(x[None], tails / np.linalg.norm(tails[0]), axes=1)[:, :N]


def ports(mid, smear_s, side_db):
    smear = rng.choice([-1, 1], SR // 10) * np.exp(-np.arange(SR // 10) / (smear_s * SR))
    smeared = signal.oaconvolve(mid, smear / np.linalg.norm(smear))
    side = amplitude_ratio(side_db) * colour(smeared, PORT_SIDE)
    return np.array([mid + side, mid - side])


def pan(db):
    return amplitude_ratio(np.array([[db / 2], [-db / 2]]))


def scene():
    # sound, left minus right in dB, side level in dB
    near = [(boil(), 0.6, -12), (pour() + slosh() + trickle(), 0.5, -11), (seat(), -1.0, -11),
            (taps(), 2.5, -7), (spoon(), -.6, -8), (mug_slide(), 0.6, -11)]
    firm = signal.butter(2, 90, "high", fs=SR, output="sos")
    near = [(signal.sosfilt(firm, x), pan_db, side_db) for x, pan_db, side_db in near]
    steel = spoon_ring()
    mid, side = water(), amplitude_ratio(-5.5) * colour(water(), PORT_SIDE)
    out = np.array([mid + side, mid - side]) * pan(0.6)
    out = out + ports(steps() + focus_motor(), smear_s=.01, side_db=-4.0) + steel
    out = out + sum(ports(x, smear_s=0.008, side_db=side_db) * pan(pan_db) for x, pan_db, side_db in near)
    return out + amplitude_ratio(-12.5) * room(steel.mean(axis=0) + sum(x for x, _, _ in near))


def roll_off(x):
    return signal.sosfilt(signal.butter(12, 16650, fs=SR, output="sos"), x)


def record(dry):
    dry = signal.sosfilt(signal.butter(1, 40, "high", fs=SR, output="sos"), dry)
    dry = signal.sosfilt(signal.cheby2(10, 50, TOP_HZ, fs=SR, output="sos"), dry)
    mid, side = (dry[0] + dry[1]) / 2, (dry[0] - dry[1]) / 2
    size = next_fast_len(N)
    hz = np.fft.rfftfreq(size, 1 / SR)
    folded = (hz > MONO_BAND_HZ[0]) & (hz < MONO_BAND_HZ[1])
    mid_band = irfft(rfft(mid, size) * folded, size)[:N]
    side_band = irfft(rfft(side, size) * folded, size)[:N]
    power = uniform_filter1d(mid_band ** 2, size=1024)
    side = side - side_band * 0.87 / (1 + (power / amplitude_ratio(2 * LOUD_DB)) ** 2)
    mix = np.clip([mid + side, mid - side], -.96, .96)
    return roll_off(mix)


dry = scene()
out = record(dry)
unload_audio(out)
```